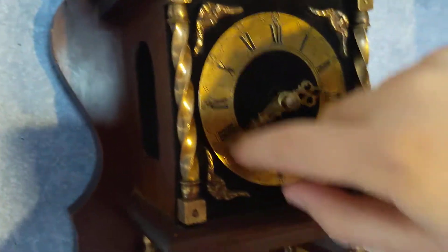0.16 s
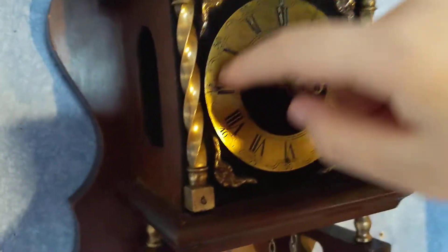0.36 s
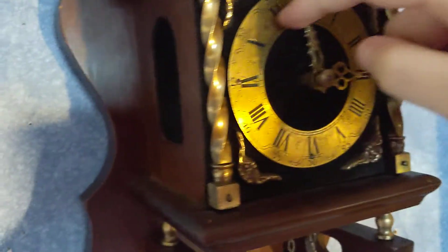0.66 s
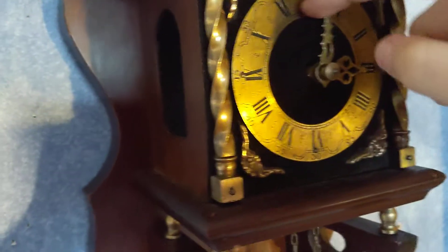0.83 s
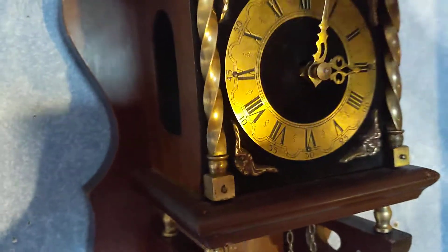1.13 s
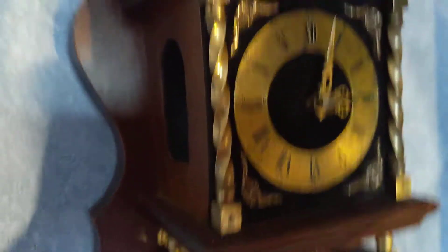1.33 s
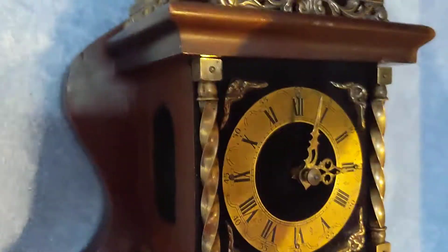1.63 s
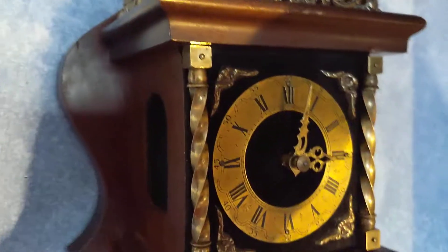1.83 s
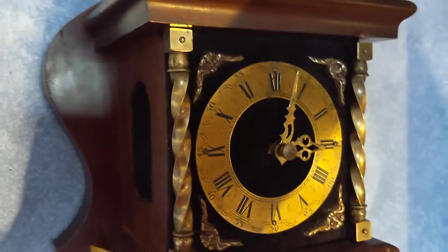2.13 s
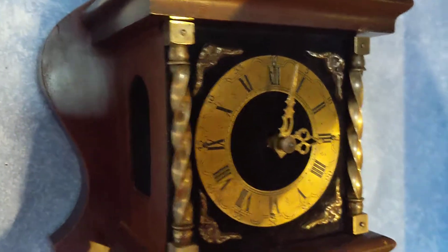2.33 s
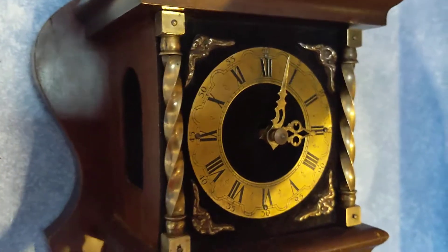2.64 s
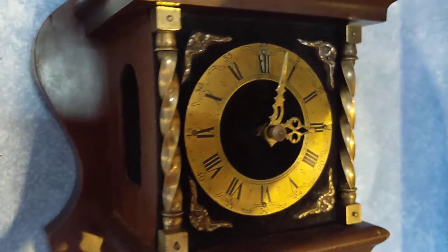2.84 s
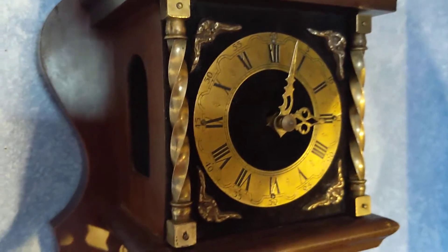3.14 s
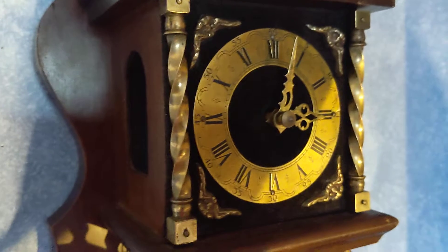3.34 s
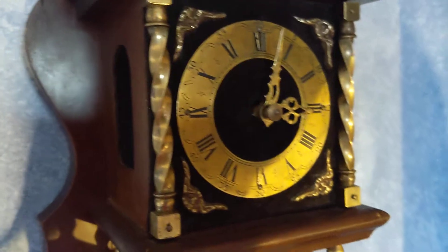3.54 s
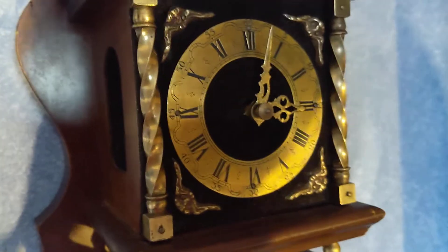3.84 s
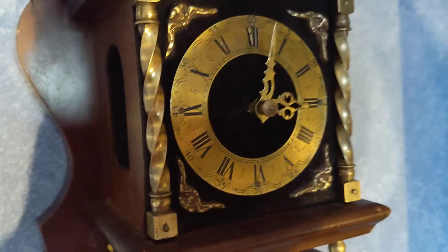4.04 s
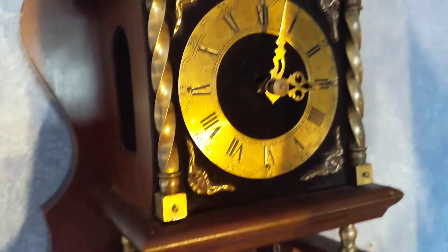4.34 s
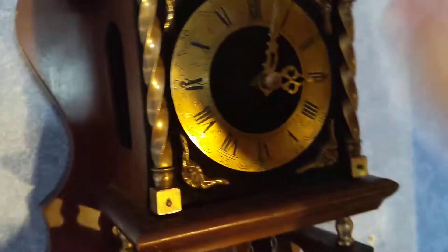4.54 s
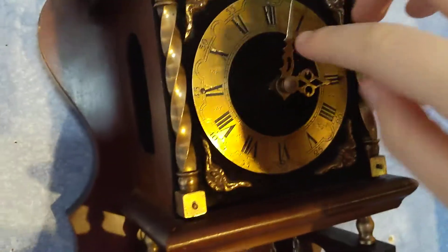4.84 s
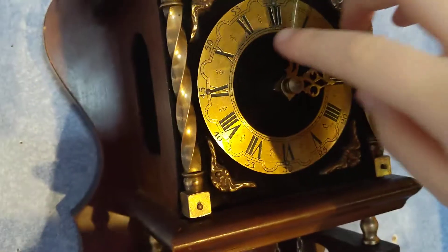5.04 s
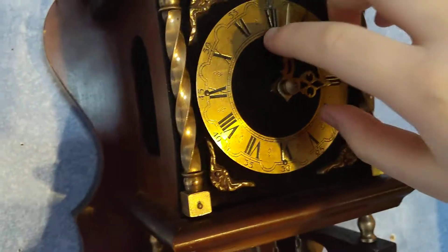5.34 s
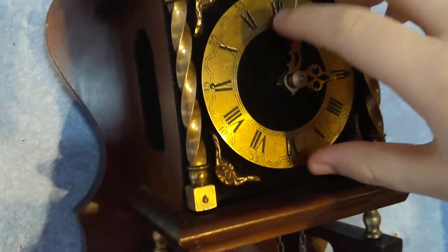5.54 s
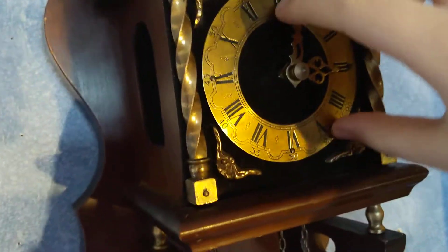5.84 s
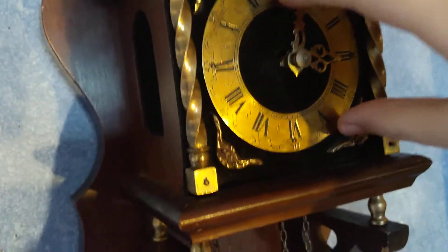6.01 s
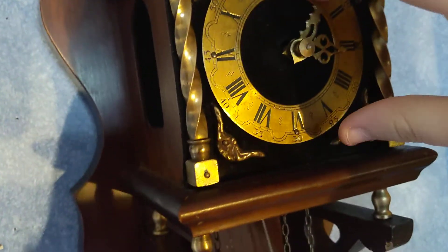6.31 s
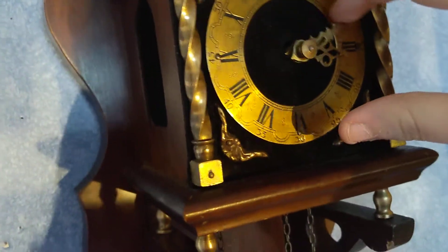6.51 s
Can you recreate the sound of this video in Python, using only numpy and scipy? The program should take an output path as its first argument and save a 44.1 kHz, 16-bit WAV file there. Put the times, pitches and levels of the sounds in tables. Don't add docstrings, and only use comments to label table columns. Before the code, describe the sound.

In a quiet room, a clock's lever clicks, its gears rattle, and a small bell dings three times, each tail shimmering and fading.

```python
import sys
import numpy as np
from scipy import signal
from scipy.fft import rfft, irfft, next_fast_len
from scipy.io import wavfile

SR = 44100
rng = np.random.default_rng(int(sys.argv[2]) if len(sys.argv) > 2 else 0)


def to_linear_factor(level_db):
    exponent = np.asarray(level_db, float) / 20
    return 10 ** exponent


def log_audio(samples):
    frames = np.atleast_2d(samples).T
    limited = np.clip(frames, -1, 1)
    pcm = np.round(limited * 32767).astype(np.int16)
    wavfile.write(sys.argv[1], SR, pcm)


N = 294383

# frequency in Hz, level in dB per Hz over FLOOR_DB.
FLOOR_COLOUR = [(65, -28), (110, 8), (271, -3.5), (541, 1), (757, -5), (914, -4), (1940, -21),
                (3420, -30.5), (4990, -25.5), (5660, -9), (6700, -25.5), (7600, -13), (10800, -13),
                (15200, -15), (16500, -40)]
FLOOR_DB = -105
WHINE_HZ, WHINE_WIDTH_HZ, WHINE_DB = 5750, 390, -77
# time in seconds, level in dB.
RUMBLE = [(0.0, -71.5), (0.8, -66.5), (1.1, -62), (1.9, -64), (3.2, -67), (3.29, -59.5), (3.64, -68.5),
          (4.14, -65), (4.35, -70), (5.8, -73.5), (5.92, -52), (6.04, -59), (6.16, -58), (6.3, -71),
          (6.68, -76)]
# frequency in Hz, left over right in dB.
LEAN = [(60, 0), (380, 2), (1300, 6.5), (3000, 10), (15000, 6.5)]
# frequency in Hz, left-right correlation.
LIKENESS = [(60, 0.92), (250, 0.15), (1400, 0.56), (3100, .1), (15000, 0.076)]
ROOM_T60_S, ROOM_DB = 0.33, -17
CUTOFF_HZ, PEAK = 16200, 1.2

# first tick in seconds, period in seconds, level at 3-4.4 kHz in dB.
FAR_CLOCKS = [
    (0.128, .501, -65),
    (.235, 0.8702, -61.5),
]
FAR_KNOCK_DB, FAR_KNOCK_HZ = -59, 488
# time in seconds, peak in dB.
STIRS = [(0.389, -59), (0.5, -56.5), (0.7028, -61), (0.8071, -62), (1.0094, -53.5), (1.3513, -56.5),
         (1.5234, -57.5), (1.7529, -62.5), (2.5498, -56), (2.7394, -63.5), (2.9013, -62), (2.9866, -52.5),
         (3.4979, -55), (4.409, -59), (4.5205, -55), (4.9057, -61), (4.9846, -55.5), (5.3662, -52.5),
         (5.5228, -59), (5.803, -61), (5.9125, -59), (6.2512, -61), (6.4146, -63.5), (6.5083, -57.5)]
STIR_TRIM_DB, STIR_RISE_S, STIR_T60_S, HUSH_DB = -8, 0.0036, 0.34, -74.5
# frequency in Hz, level in dB per Hz.
SCUFF_COLOUR = [(200, -17.5), (500, -6.5), (1000, -3.5), (1600, -7), (2400, -5), (3600, -0.5), (4800, -11),
                (6500, -17.5), (9000, -25)]

ESCAPEMENT_S, SWING_S = .086, .8895
ESCAPEMENT_DB, ESCAPEMENT_HZ = -60, 650
# time in seconds, peak in dB, panel frequency in Hz.
KNOCKS = [(0.13, -62, 285), (0.473, -54.5, 661), (0.619, -60, 494), (0.56, -58, 883), (0.863, -61, 880),
          (0.9, -50.5, 671), (0.902, -54.5, 1503), (1.356, -55, 654), (1.49, -62, 520), (1.976, -48, 661),
          (2.102, -59.5, 657), (2.209, -40, 931), (2.264, -45, 677), (2.307, -48.5, 935),
          (2.407, -48.5, 723), (2.439, -57.5, 931), (3.105, -57, 695), (3.235, -41, 916),
          (3.262, -41.5, 673), (3.313, -48, 850), (3.906, -48.5, 1910), (3.912, -39.5, 628),
          (3.99, -47, 650), (3.968, -43.5, 700), (4.028, -40, 661), (4.099, -47, 704), (4.174, -48, 880),
          (4.911, -58, 653), (4.915, -63, 912), (5.19, -61.5, 938), (5.809, -56, 657), (6.43, -65.5, 526),
          (6.49, -63.5, 504)]
# time in seconds, peak in dB.
TICKS = [(0.4664, -61), (0.7037, -56.5), (1.3466, -61.5), (1.8676, -66), (2.102, -73), (2.1276, -62),
         (3.1328, -58.5), (3.1627, -57), (3.1963, -59.5), (3.9056, -61), (3.9633, -57), (3.9685, -43.5),
         (3.99, -58), (4.0173, -60.5), (4.9028, -59), (5.4176, -65.5), (5.8031, -60), (5.942, -65.5),
         (6.15, -72), (6.3104, -69)]
# start in seconds, hold in seconds, level at 3-4.4 kHz in dB,
# bass level in dB, treble level in dB.
BURSTS = [(.899, 0.0031, -50, -46.5, -42.5), (1.97, 0.033, -66.5, -61.5, -79),
          (2.208, .01, -42, -42, -29.5), (2.31, 0.013, -48.5, -45, -36), (2.365, 0.1, -61.5, -56, -52.5),
          (3.099, .02, -80, -60, -73.5), (3.13, 0.081, -67, -62.5, -68.5),
          (3.233, 0.0058, -39.5, -38.5, -27), (3.283, 0.14, -54, -50, -41),
          (3.908, 0.029, -54.5, -55.5, -72.5), (3.961, 0.0093, -48.5, -50.5, -59),
          (3.984, 0.0092, -59, -49.5, -75), (4.019, .01, -57.5, -53.5, -57.5),
          (4.049, 0.026, -44.5, -39.5, -35.5), (4.17, .01, -52.5, -49.5, -41),
          (4.196, 0.085, -55, -50, -51)]
BURST_SAG_DB_PER_S = 60.5
STOP_SHARE = 0.82
DEEP_DB, DEEP_LAG_S = -7, .012
# low edge in Hz, high edge in Hz.
RATTLE_BANDS = [(130, 400), (550, 1000), (3100, 4400), (11000, 13000)]
RATTLE_TRIM_DB = [-2.6, -5, -3, -7.5]
BURST_T60_S = [0.21, .2, 0.17, .16]
# frequency in Hz, level in dB per Hz.
RATTLE_COLOUR = [(110, -10), (215, -10.5), (320, -10), (500, -29), (800, -4.5), (1300, -30), (2300, -21),
                 (3400, -16), (4500, -20.5), (5500, -15), (8500, -36.5), (11800, -22.5), (13000, -36),
                 (15500, -38)]
# frequency in Hz, width in Hz, level in dB.
CASE = [(657, 22, -4.5), (931, 15, -8), (300, 45, -6), (217.8, 20, -6)]
PLATE_HZ = [1930, 3300, 5480, 9520, 11720, 12400, 14450, 15530]
PLATE_DB = [-22.5, -3, -2.5, -13.5, -7, -14, -10.5, -5.5]
PLATE_WIDTH_HZ = 90
LEVER_S, LEVER_DB = .8992, -32
LEVER_HZ = [657, 5464, 5518, 7564, 10170, 11850, 14230, 14440]
LEVER_T60_S = [.08, .075, .06, .04, .06, .055, .05, .06]
LEVER_MODE_DB = [-15.5, -3.5, -3.5, -10, -0.5, -0.5, 3, -19]

# time in seconds, hum partial in dB, its fade-out in seconds, top partial in dB,
# its right port in dB, crack in dB.
STROKES = [
    (2.2054, -50, 0.5, -26.5, 7, -17),
    (2.3068, -44.5, 0.28, -23.5, -5.5, -21.5),
    (3.234, -53, 0.36, -11, -11.5, -19.5),
    (4.05, -50.5, 0.36, -24.5, -4.5, -22),
]
HUM_HZ, HUM_T60_S, TOP_HZ, TOP_T60_S = 1070.6, 4.2, 13651.5, 0.59
TOP_SWELL_S, TOP_SWELL_DB, TOP_SWELL_RIGHT_DB = 0.29, -28.5, -17
PARTIAL_HZ = [2738.2, 4864.1, 7398.1, 10324.8]
TWIN_HZ = [4872.5, 7409, 10331.5, 13641]
# decay time in seconds, right port in dB, then dB at the first stroke, the rebound
TWINS = [(.6, -7, -35, -42.5, -39.5, -33.5), (0.69, -5.5, -46.5, -49, -40, -33),
         (0.97, -12, -36.5, -42, -41, -32.5), (0.63, -1.5, -37.5, -49.5, -32, -31.5)]
SHADE_DB = [(-33, -15.5, -14, 3), (-28, -15.5, -20, -16), (-25.5, -18, -13.5, -15),
            (-38, -31, -10.5, -10.5)]
SHADE_RAD = [-2, 1.8, -1.5, 4]
TAIL_DB = [(-83, -59, -55, -76), (-36.5, -29.5, -20.5, -28), (-38, -27, -46, -43.5),
           (-44.5, -30.5, -35.5, -37.5)]
TAIL_SAG_DB_PER_S = [11.2, 12.9, 18, 20]
TAIL_GONE_S = [(0.45, 1.0, 2.8, 0.92), (0.66, .82, 1.5, 1.07), (0.57, 0.86, 0.96, .9),
               (0.49, 0.54, 4.5, 1.19)]
TAIL_LEFT = [.01, 0.21, 0.16, .003]
# start in seconds, rise in seconds, length in seconds.
BLOOMS = [
    (2.2057, 0.000994, 0.03),
    (2.3013, .002, 0.19),
    (3.235, 0.00084, 0.19),
    (4.047, 0.027, 0.26),
    (4.323, 0.15, .2),
]
BLOOM_DB = [(-46, -33.5, -39.5, -19.5), (-77, -48, -29.5, -21.5), (-40.5, -38, -28.5, -19),
            (-65, -47, -28, -27), (-48, -70, -30, -31)]
BLOOM_RISE_S = [0.0011, 0.00081, 0.037, 0.0018]
BLOOM_RAD = [.2, 0.89, .3, 1.9]
BLOOM_BEAT_PER_S = [3.8, 4.14, 1.733, 0.62]


def in_time(rows):
    s, *columns = np.transpose(rows)
    return np.array([np.interp(np.arange(N) / SR, s, c) for c in columns])


def at_hz(points, hz):
    return np.interp(np.log(hz), np.log(np.array(points)[:, 0]), np.array(points)[:, 1])


def rms_one(x):
    return x / np.sqrt(np.mean(x ** 2) + 1e-20)


def left_right(left_db, right_db):
    return to_linear_factor([[left_db], [right_db]])


def filtered(x, order, hz, kind):
    return signal.sosfilt(signal.butter(order, hz, kind, fs=SR, output="sos"), x)


def flicker(per_s):
    r = np.exp(-80 * np.pi * per_s / SR)
    slow = signal.lfilter([1], [1, -2 * r, r * r], rng.standard_normal(N // 40 + 502))[500:]
    return np.interp(np.arange(N) / 40, np.arange(len(slow)), rms_one(slow))


def clicks(seconds, level_db):
    x = np.full(N, 1e-18)
    x[np.round(np.asarray(seconds) * SR).astype(int)] = to_linear_factor(level_db)
    return x


def ring(x, hz, t60):
    r, w = to_linear_factor(-60 / (t60 * SR)), 2 * np.pi * hz / SR
    return signal.lfilter([0, np.sin(w)], [1, -2 * r * np.cos(w), r * r], x)


def burst(x, t60):
    return signal.lfilter([1], [1, -to_linear_factor(-60 / (t60 * SR))], x) * rng.standard_normal((2, N))


def ports(x, lean_db, lag=3):
    return np.array([x * to_linear_factor(lean_db / 2), -np.roll(x, round(lag)) * to_linear_factor(-lean_db / 2)])


def falling(rows, rise_s, t60, sag_db_per_s=0):
    t = np.arange(0, N + 32, 32) / SR
    s, hold, level_db = np.transpose(rows)[:, :, None]
    since = t - s
    release_db = 60 * np.clip(since - hold, 0, None) / t60 / np.where(hold > .05, STOP_SHARE, 1)
    held_db = -sag_db_per_s * np.minimum(since, hold) - release_db
    shape_db = np.where(since < 0, 20 * since / rise_s, held_db)
    loudest_db = np.clip((level_db + shape_db).max(axis=0), -110, 0)
    return np.interp(np.arange(N) / SR, t, loudest_db)


def latest_stroke(t):
    starts = np.array([0, STROKES[0][0], STROKES[2][0], STROKES[3][0]])
    stroke = np.searchsorted(starts, t, "right") - 1
    return stroke, t - starts[stroke]


def rumble():
    mid, side = filtered(rng.standard_normal((2, N)), 2, [28, 50], "band")
    creak = rms_one(ring(rng.standard_normal(N), 150, t60=0.049))
    shake = rms_one(mid) + 0.27 * creak + 0.1458 * rms_one(side) * [[1], [-1]]
    return to_linear_factor(in_time(RUMBLE)[0]) * shake * left_right(.6, -.6)


def whine(white):
    t60 = 0.98 / WHINE_WIDTH_HZ
    tone = ring(ring(white, WHINE_HZ, t60), WHINE_HZ, t60)
    return to_linear_factor(WHINE_DB) * rms_one(tone) * left_right(4, -4)


def far_beats():
    return [[(s, level_db) for s in np.arange(first, N / SR - .01, period)]
            for first, period, level_db in FAR_CLOCKS]


def rustle_db():
    events = [(s, peak_db + STIR_TRIM_DB) for s, peak_db in STIRS] + sum(far_beats(), [])
    rows = [(s + STIR_RISE_S, .01, level_db) for s, level_db in events]
    return np.maximum(HUSH_DB, falling(rows, STIR_RISE_S, STIR_T60_S))


def rattle_db():
    s, hold, mid_db, bass_db, treble_db = np.transpose(BURSTS)
    parts = [(s + DEEP_LAG_S, bass_db + DEEP_DB, DEEP_LAG_S), (s, bass_db, .003),
             (s, mid_db, .001), (s, treble_db, .001)]
    return np.array([falling(np.transpose([at, hold, level_db]), rise, t60, BURST_SAG_DB_PER_S)
                     for (at, level_db, rise), t60 in zip(parts, BURST_T60_S)])


def floor_rustle_and_rattle(white, levels, heights):
    edges = 110 * 2 ** np.arange(0, 7.4, 1 / 3)
    low, high = np.transpose(RATTLE_BANDS)
    centre = np.sqrt(low * high)
    trim_db = RATTLE_TRIM_DB - 10 * np.log10(high - low) - at_hz(RATTLE_COLOUR, centre)
    band_db = levels + trim_db[:, None]
    scuff_db = rustle_db() - 33.5
    teeth_db, patch = 1.9 * flicker(300), flicker(2.7)
    masked_db = -1.1 * np.clip(20 * np.log10(heights[2:].max(axis=0) + 1e-9) + 58, 0, 15)
    out = 0
    for k, (a, b) in enumerate(zip(edges, edges[1:])):
        hz, own = np.sqrt(a * b), flicker(12)
        patch = .6 * patch + .8 * own
        share = [np.interp(np.log(hz), np.log(centre), row) for row in np.eye(len(centre))]
        lumps_db = teeth_db + (2 + 2.5 * (hz > 5000)) * own
        rattle = to_linear_factor(share @ band_db + at_hz(RATTLE_COLOUR, hz) + lumps_db)
        scuff = to_linear_factor(scuff_db + at_hz(SCUFF_COLOUR, hz) + 3 * patch)
        floor = to_linear_factor(FLOOR_DB + at_hz(FLOOR_COLOUR, min(hz, 15200)) + 0.8 * own)
        gate = np.interp(hz, [5600, 6200, 11060, 13940], [0.062, 0.91, 0.65, 0.11])
        quiet_power = (scuff ** 2 + floor ** 2) * to_linear_factor(2 * masked_db * gate)
        gain = np.sqrt(rattle ** 2 + quiet_power)
        mid, side = filtered(white[k % 2], 2, [a, b], "band")
        alike, lean = np.clip(at_hz(LIKENESS, hz), -.99, .99), at_hz(LEAN, hz) / 2
        pair = np.sqrt(1 + alike) * mid + np.sqrt(1 - alike) * side * [[1], [-1]]
        out = out + gain * pair * left_right(lean, -lean) * 0.89
    return out


def case_panels(white, levels):
    panels = sum(to_linear_factor(level_db + levels[int(hz > 400)]) * rms_one(ring(white, hz, 5.2 / width))
                 for hz, width, level_db in CASE)
    return panels * left_right(3, -6)


def brass_plates(white, levels):
    out = 0
    for hz, level_db in zip(PLATE_HZ, PLATE_DB):
        plate = rms_one(ring(white, hz, 2.2 / PLATE_WIDTH_HZ)) * left_right(5, -4)
        out = out + plate * to_linear_factor(level_db + levels[2 + (hz > 8000)] + 1.6 * flicker(27))
    return out


def noises(heights):
    white = rng.standard_normal((2, 2, N)) * np.sqrt(SR / 2)
    levels = rattle_db()
    out = floor_rustle_and_rattle(white, levels, heights)
    return out + case_panels(white[0, 0], levels) + brass_plates(white[1], levels) + whine(white[0])


def knocks():
    out, size = np.zeros(N), SR // 5
    rows = [*KNOCKS]
    rows += [(s, FAR_KNOCK_DB, FAR_KNOCK_HZ) for s, _ in far_beats()[1]]
    rows += [(s, ESCAPEMENT_DB, ESCAPEMENT_HZ) for s in np.arange(ESCAPEMENT_S, N / SR, SWING_S)]
    contact = rng.standard_normal((len(rows), size)) * to_linear_factor(-60 * np.arange(size) / SR / 0.047)
    for (s, level_db, hz), push in zip(rows, contact):
        sound = ring(push, hz, t60=0.14) + 0.35 * ring(push, 1.42 * hz, t60=0.085)
        at = round(s * SR)
        out[at:at + size] += (to_linear_factor(level_db + 2.0) * sound / abs(sound).max())[:N - at]
    return out * left_right(3, -4)


def ticks():
    s, level_db = np.transpose(TICKS)
    puffs = burst(clicks(s, level_db + 10.0), t60=0.03) * left_right(3, -4)
    return filtered(puffs, 1, 3000, "high")


def lever():
    hits = clicks([LEVER_S, LEVER_S + 0.0033], [LEVER_DB - 1.5, LEVER_DB])
    modes = sum(ring(hits, hz, t60) * to_linear_factor(level_db)
                for hz, level_db, t60 in zip(LEVER_HZ, LEVER_MODE_DB, LEVER_T60_S))
    scrape = np.diff(burst(clicks([LEVER_S], [LEVER_DB - 6]), t60=0.039), prepend=0)
    return ports(modes, lean_db=13.0) + scrape * [[1], [.4]]


def ringing():
    t = np.arange(0, N + 16, 16) / SR
    stroke, since = latest_stroke(t)
    since = since[:, None]
    kept = 1 - np.clip(since / np.array(TAIL_GONE_S)[stroke], 0, 1) ** 1.9
    spared = np.array(TAIL_LEFT)[stroke][:, None] * (np.array(PARTIAL_HZ) > PARTIAL_HZ[0])
    tail = to_linear_factor(np.array(TAIL_DB)[stroke] - since * TAIL_SAG_DB_PER_S) * np.maximum(kept, spared)
    out = tail + 0j
    for (s, rise, length), level_db in zip(BLOOMS, BLOOM_DB):
        age = np.clip(t - s, 0, length)[:, None]
        shape = np.clip(age / (rise + np.array(BLOOM_RISE_S)), 0, 1) * (1 - (age / length) ** 2.58)
        turn = np.exp(1j * (BLOOM_RAD + 2 * np.pi * age * BLOOM_BEAT_PER_S))
        out += to_linear_factor(level_db) * shape * turn
    return np.repeat([abs(out.T), np.angle(out.T)], 16, axis=2)[..., :N]


def long_partials(heights, shifts):
    out = np.zeros((2, N))
    stroke, since = latest_stroke(np.arange(N) / SR)
    for hz, height, shift, shade_db, rad in zip(PARTIAL_HZ, heights, shifts, np.transpose(SHADE_DB), SHADE_RAD):
        height = height * to_linear_factor(1.3 * flicker(30) * np.exp(-since / .15))
        phase = 2 * np.pi * hz * since + shift
        right = to_linear_factor(shade_db[stroke]) * np.sin(phase + rad)
        out += np.sqrt(2) * height * np.array([np.sin(phase), right])
    return out


def hum_top_and_twins():
    t, out = np.arange(N) / SR, np.zeros((2, N))
    s, hum_db, fade_s, top_db, top_right_db, _ = np.transpose(STROKES)
    for at, level_db, fade in zip(s, hum_db, fade_s):
        kept = 1 - np.clip((t - at) / fade, 0, 1) ** 3.3
        out += ring(clicks([at], [level_db]), HUM_HZ, HUM_T60_S) * kept * left_right(0, -10)
    out += np.array([to_linear_factor(0.416 * flicker(27)) * ring(clicks(s, level_db), TOP_HZ, TOP_T60_S)
                     for level_db in (top_db, top_db + top_right_db)])
    held = 1 - np.clip((t - s[3]) / TOP_SWELL_S, 0, 1) ** 4.8
    swell = ring(clicks(s[3:], [TOP_SWELL_DB]), TOP_HZ, t60=3.3) * held
    out += swell * left_right(0, TOP_SWELL_RIGHT_DB)
    for hz, (t60, right_db, *level_db) in zip(TWIN_HZ, TWINS):
        out += ring(clicks(s, level_db), hz, t60) * [[1], [-to_linear_factor(right_db)]]
    return out


def hammer_crack():
    s, *_, crack_db = np.transpose(STROKES)
    crack = burst(clicks(s, crack_db), t60=0.0048) * left_right(0, -9)
    return filtered(crack, 1, 2500, "high")


def room(x):
    size = next_fast_len(N + SR)
    w = 2 * np.pi * np.arange(size // 2 + 1) / size
    out = []
    for side, lags in zip(x, (rng.uniform(.006, 0.039, (2, 10)) * SR).astype(int)):
        loops = [to_linear_factor(-60 * d / SR / ROOM_T60_S) * np.exp(-1j * w * d) for d in lags]
        echoes = sum((-1) ** k * g / (1 - g) for k, g in enumerate(loops))
        out.append(irfft(rfft(side, size) * echoes, size)[:N])
    return to_linear_factor(ROOM_DB) * np.array(out)


def scene():
    heights, shifts = ringing()
    bell = long_partials(heights, shifts) + hum_top_and_twins()
    blows = hammer_crack() + ticks() + knocks()
    return bell + lever() + blows + room(blows) + noises(heights) + rumble()


def low_pass(x):
    return signal.sosfilt(signal.butter(12, 17150, fs=SR, output="sos"), x)


def record(dry):
    rounded = PEAK * np.tanh(dry / PEAK)
    mix = signal.sosfilt(signal.cheby2(10, 24, CUTOFF_HZ, fs=SR, output="sos"), rounded)
    return low_pass(mix)


dry = scene()
out = record(dry)
log_audio(out)
```